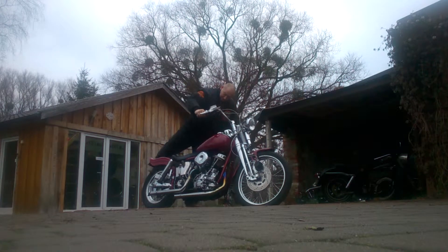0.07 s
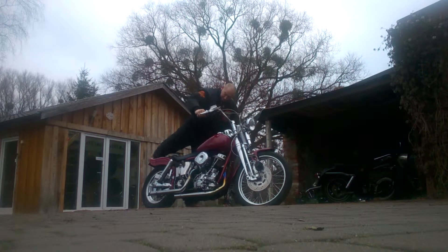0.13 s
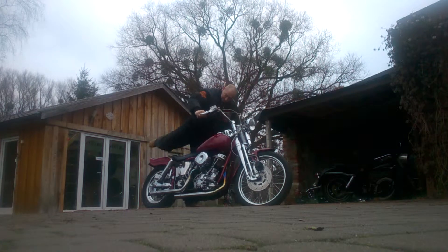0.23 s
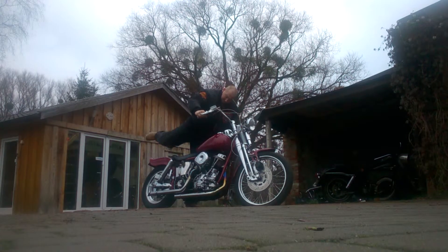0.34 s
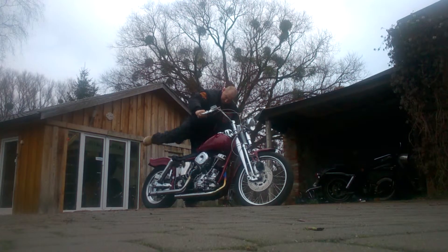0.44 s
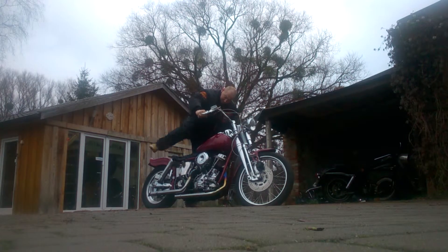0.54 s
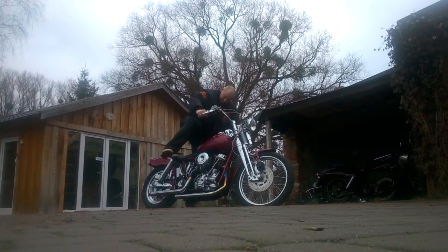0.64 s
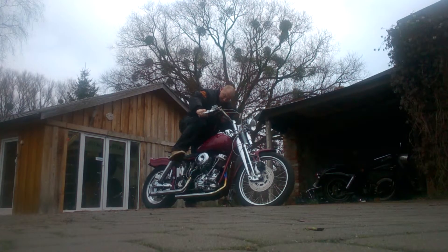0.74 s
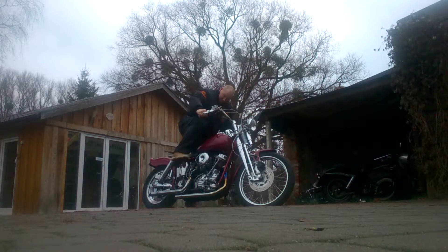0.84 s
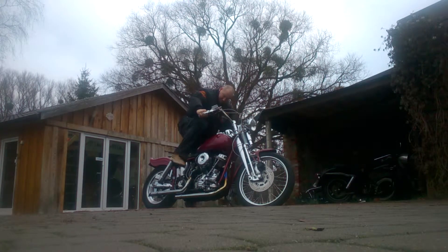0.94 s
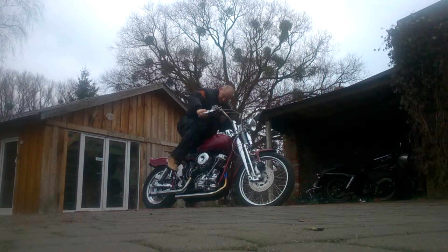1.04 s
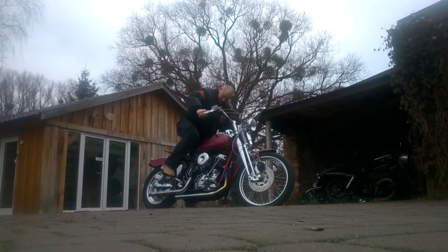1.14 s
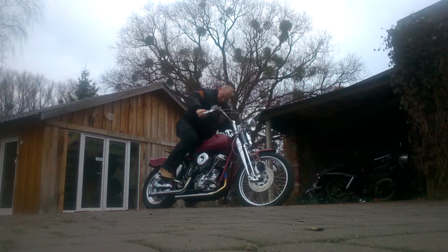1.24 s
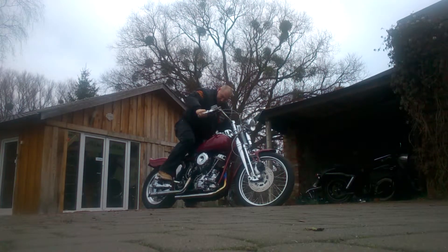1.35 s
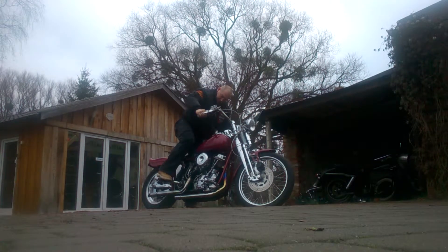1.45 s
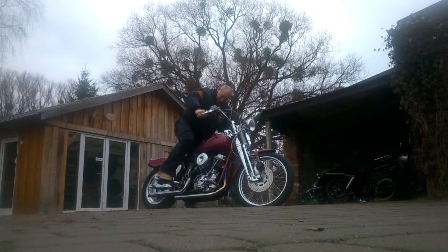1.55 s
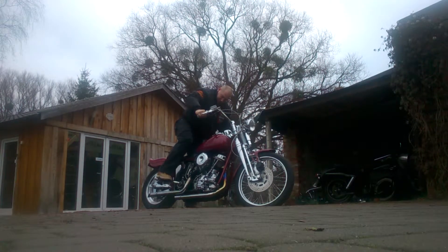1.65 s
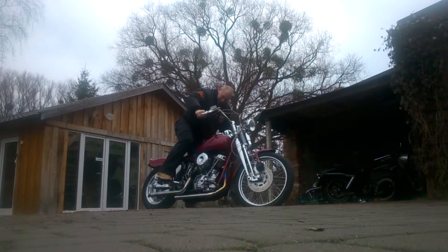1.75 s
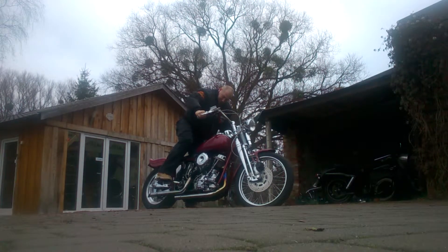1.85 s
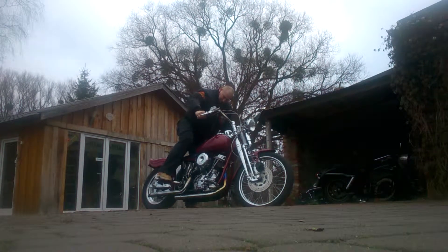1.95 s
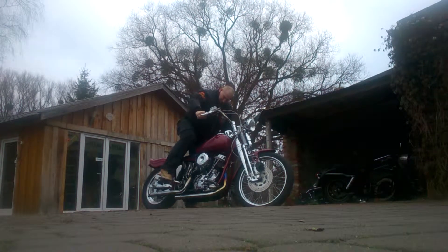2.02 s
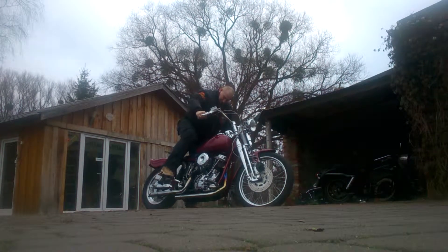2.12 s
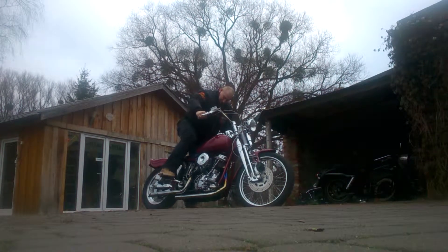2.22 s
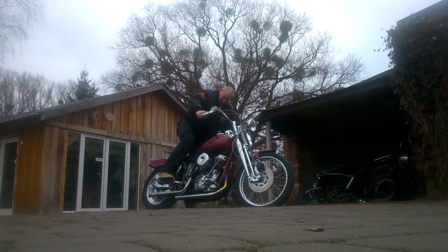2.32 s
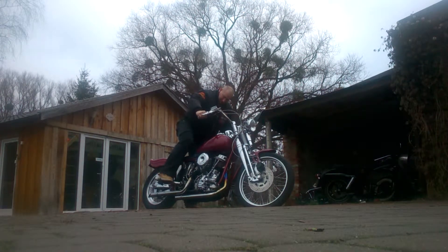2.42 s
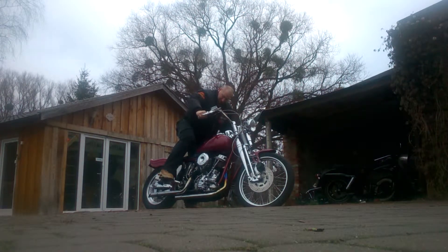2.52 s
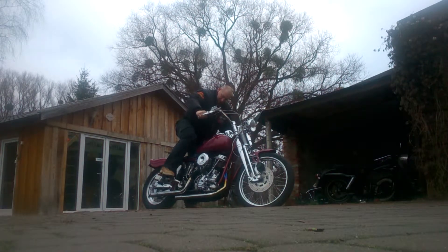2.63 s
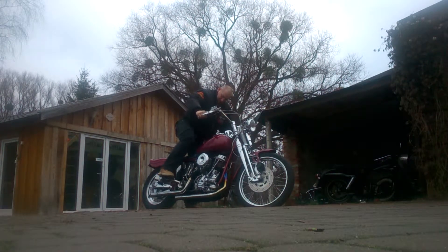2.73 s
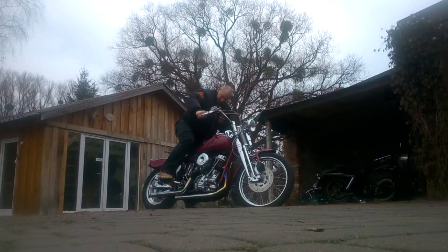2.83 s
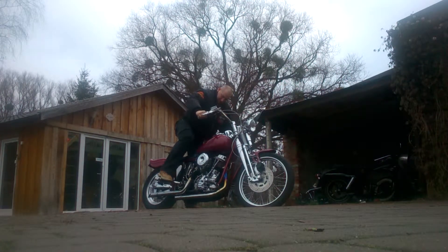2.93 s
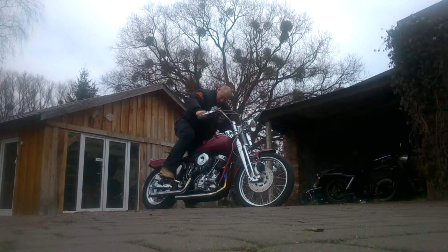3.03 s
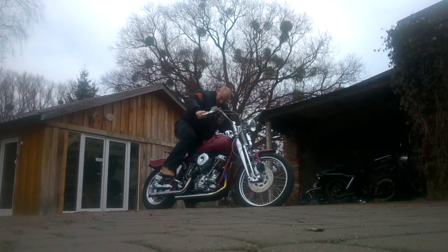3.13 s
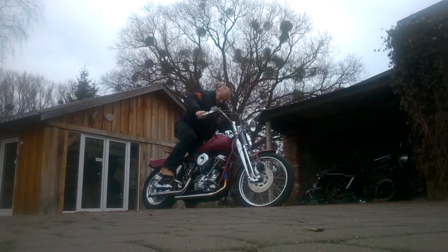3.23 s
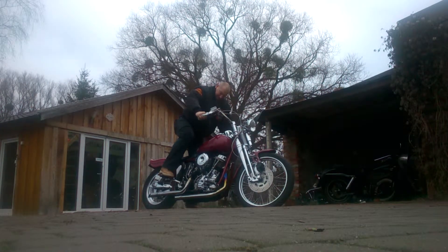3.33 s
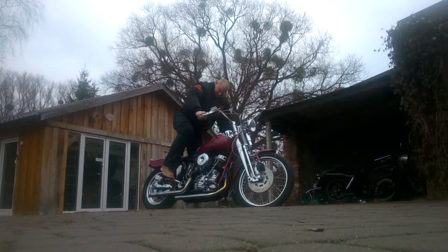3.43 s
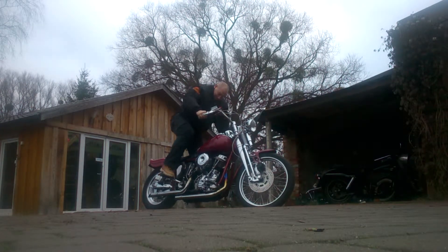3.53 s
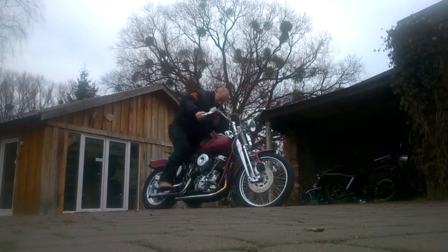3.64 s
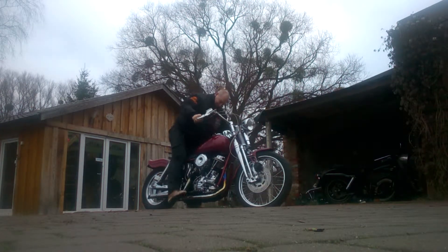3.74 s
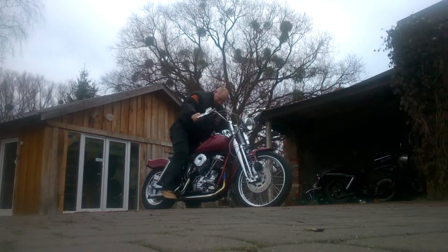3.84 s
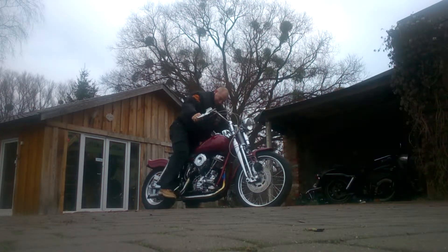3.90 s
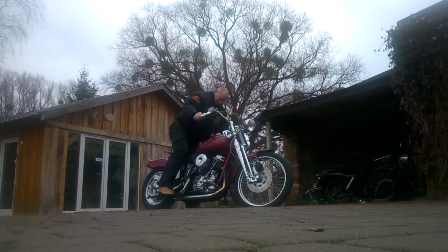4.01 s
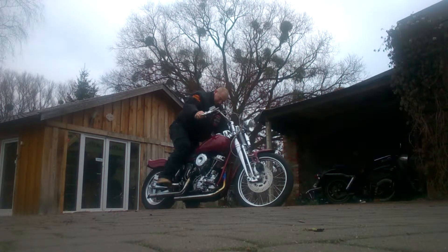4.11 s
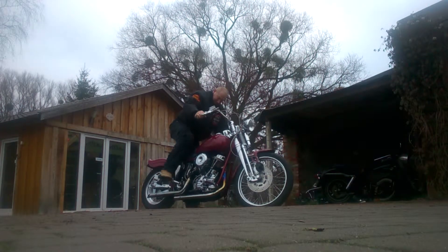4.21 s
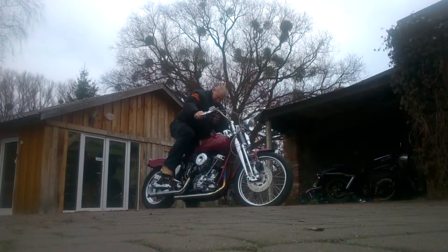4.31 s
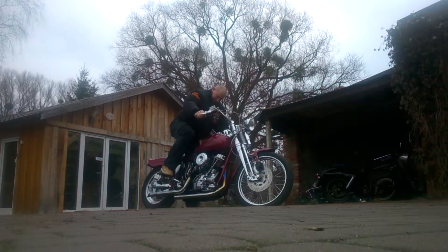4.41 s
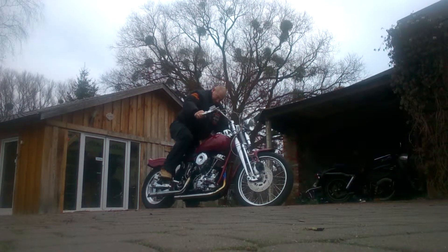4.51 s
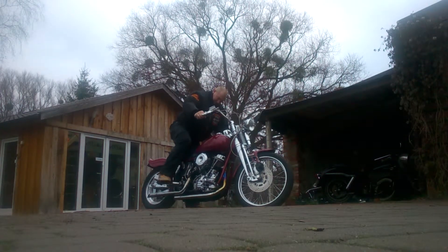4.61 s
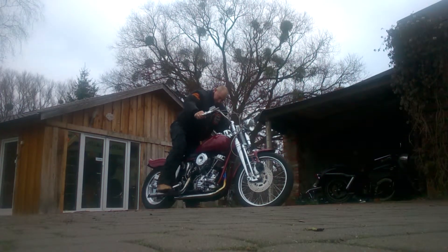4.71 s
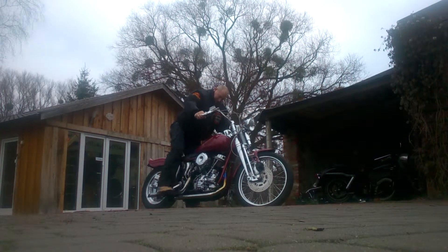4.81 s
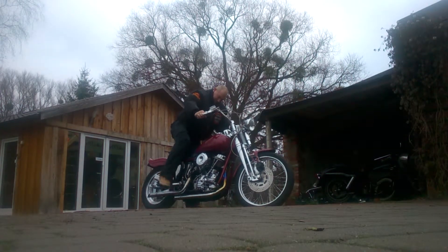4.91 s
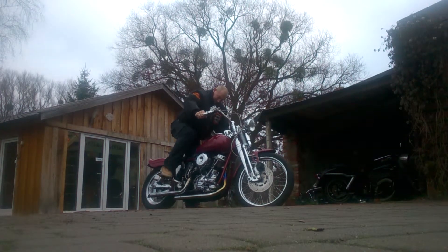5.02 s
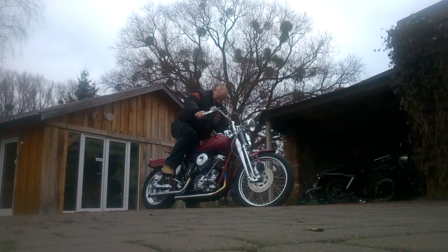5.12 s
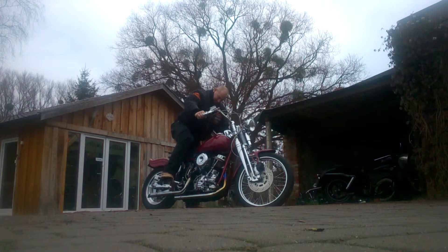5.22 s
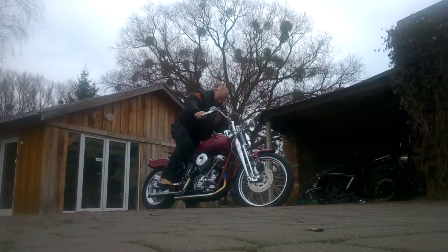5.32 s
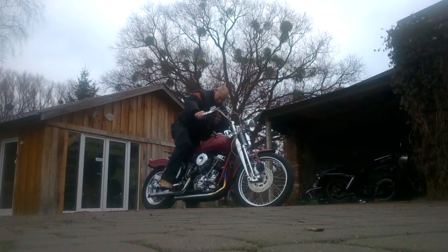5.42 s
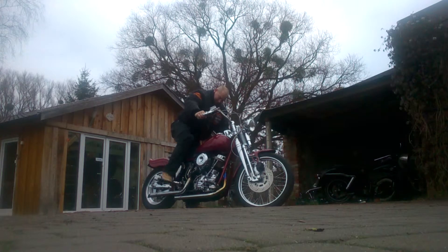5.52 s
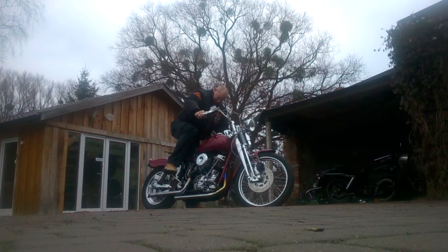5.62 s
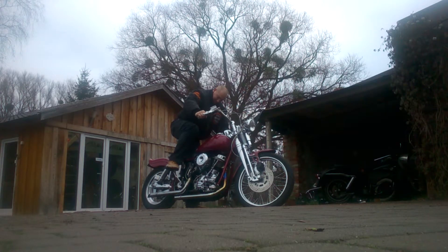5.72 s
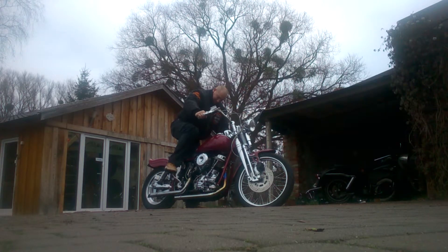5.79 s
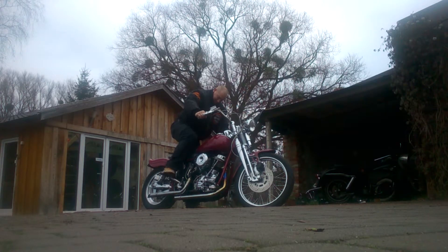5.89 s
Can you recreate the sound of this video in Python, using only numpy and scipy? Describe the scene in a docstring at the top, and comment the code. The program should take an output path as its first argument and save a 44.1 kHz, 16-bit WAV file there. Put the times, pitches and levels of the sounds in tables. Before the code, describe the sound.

A still paved yard between sheds, with low distant rumble, faint air hiss and barely audible bird chirps. Clothes and boots rustle softly from about 0.6 s. At 1.0 s a boot touches the pedal, and between 1.1 and 1.25 s it folds out in quick, ringing steel knocks. Faint taps at 2.1 and 2.3 s, then quiet. At 3.55 s a soft touch; at 3.65 s a knock and a growing groan. The kick lands at 3.8 s: loud mechanical clatter, rasping gears, small parts pinging, an airy intake gasp and a low, wavering exhaust boom, with a second cluster around 4.05-4.15 s. It never fires. The boom fades while the frame bumps dully around 4.45-4.6 s. A weak puff and breathy draw come at 5.0 s. The lever returns with ratchet snaps at 5.3 and 5.55-5.7 s, then duller knocks until 5.95 s. Short yard echo; bike left of centre.

```python
"""Failed kick-start in a yard

A big old twin-cylinder motorcycle is kicked over once in a paved yard and does not catch.
A boot folds out the pedal in knocks built from noise bursts and ringing modes; the kick rattles the gears.
Shaped hiss makes the intake gasp, a wavering low tone the exhaust boom, damped sines the rocking bike.
The lever comes back up over its ratchet in metallic snaps; early reflections and decaying noise echo it all.
"""
import sys
import numpy as np
from scipy import signal
from scipy.fft import rfft, irfft
from scipy.io import wavfile
from scipy.ndimage import uniform_filter1d

SR = 44100
rng = np.random.default_rng(int(sys.argv[2]) if len(sys.argv) > 2 else 0)


def int16_out(signal):
    """Quantize to a 16-bit WAV file."""
    q = np.round(np.clip(np.atleast_2d(signal).T, -1, 1) * 32767)
    wavfile.write(sys.argv[1], SR, q.astype(np.int16))


N = 262615
TIME = np.arange(N) / SR
RING_TIME = np.arange(SR // 2) / SR

# Event levels are relative: layer trims and the yard come after them.
# Light breeze rumble: [t/s, level/dB]
BREEZE_LEVEL = [(0, -75.5), (1.4, -67), (1.9, -83), (2.9, -84), (3.1, -64), (5.95, -64.5)]
# Faint chirps of far birds: [t/s, level/dB, middle f/Hz, length/s]
BIRD_CHIRPS = [(0.0, -88, 2130, .22), (1.579, -76, 2600, 0.019), (2.65, -68, 1670, 0.019)]
# Shifts of the rider's boots and clothes: [middle t/s, bell width (sigma)/s, level/dB]
RIDER_SHUFFLES = [(0.64, 0.11, -68.5), (1.33, 0.098, -63), (2.4, 0.092, -66.5), (2.7, 0.061, -67),
                  (3.4, 0.32, -75.5)]
# Light taps of the boot on the pedal: [t/s, level/dB]
BOOT_TAPS = [(1.0133, -53), (2.146, -54.5), (2.3292, -54.5), (3.542, -58)]
# Blows in the pedal, gears and valve train: [t/s, level/dB, treble relative to the blow/dB]
METAL_KNOCKS = [(1.0886, -46.5, -30), (1.1248, -51, -18), (1.1484, -48.5, -12), (1.179, -37, -9),
                (1.2198, -32.5, -7), (1.2376, -31, -11), (3.6628, -39.5, -5), (3.82, -27, -4),
                (4.0332, -28, -22), (4.0523, -27.5, -4), (4.0698, -26.5, -10), (4.092, -27, -5),
                (4.1399, -30, -14), (4.8241, -52.5, 3), (4.9906, -48, -10), (5.7635, -34, -21),
                (5.7705, -35, -34), (5.881, -41, -26), (5.9293, -40.5, -22), (5.9433, -37, -16)]
# Small loose parts pinging and chattering: [t/s, level/dB, f/Hz]
LOOSE_PINGS = [(1.09, -45, 2565), (1.238, -42, 1660), (3.829, -30, 1573), (4.071, -31, 2103),
               (4.142, -41, 3900), (4.619, -50.5, 3370), (4.883, -55, 3550), (5.566, -44, 4750),
               (5.773, -43.5, 4120)]
# Dull bumps of the frame as the bike is kicked and rocks: [t/s, level/dB, f/Hz]
FRAME_BUMPS = [(1.239, -49, 244), (3.814, -33.5, 193), (3.862, -33.5, 232), (3.887, -38, 184),
               (4.16, -42, 172), (4.442, -33, 79), (4.533, -28, 69), (4.569, -35, 100), (4.615, -34, 79),
               (4.823, -44, 235), (5.309, -49, 182), (5.797, -41.5, 61)]
# How hard the lever and flywheels drive the gears: [t/s, level/dB]
GEAR_DRIVE = [(3.65, -64.5), (3.73, -56.5), (3.83, -41.5), (3.92, -45.5), (4.08, -45), (4.16, -51),
              (4.52, -65), (4.83, -57.5), (4.95, -61), (5.04, -55), (5.23, -74.5), (5.36, -67),
              (5.53, -70.5), (5.7, -71.5), (5.95, -55)]
# The pistons draw air: [middle t/s, bell width (sigma)/s, level/dB]
INTAKE_GASPS = [(3.85, 0.016, -50.5), (3.975, 0.062, -41.5), (4.26, 0.032, -53), (5.03, 0.14, -66)]
# The pistons push gas into the pipe: [t/s, length before the fall/s, level/dB]
EXHAUST_PUFFS = [(3.824, 0.038, -35.5), (4.006, 0.13, -36.5), (4.383, 0.37, -48.5), (4.982, 0.017, -46.5)]
# The last air wheezes out of the cylinder: [middle t/s, bell width (sigma)/s, level/dB]
CYLINDER_WHEEZE = [(4.33, 0.055, -66.5)]
# A thin sizzle at the carburettor on the last draw: [middle t/s, bell width (sigma)/s, level/dB]
CARBURETTOR_SIZZLE = [(5.05, 0.076, -69)]
# The ratchet pawl drops over a tooth: [t/s, level/dB, ring relative to the blow/dB, rise to 99.9 %/s]
PAWL_DROPS = [(4.616, -41, -3, 0.019), (5.293, -37.5, -4.5, 0.042), (5.564, -35, 0, 0.011),
              (5.6258, -35, 2, 0.0064), (5.69, -32, -0.5, 0.0084)]

# Ringing modes of the engine cases: [f/Hz, level/dB, t60/s]
CASE_MODES = [(560, -8, 0.12), (652.5, -7, 0.22), (867.5, 1, 0.084), (1508, 1.5, 0.085), (1594, 3.5, 0.12),
              (1845, -2, 0.11), (2016, -4, 0.14), (2110, -0.5, 0.061), (2316, -4.5, 0.17),
              (2420, -3.5, 0.083), (2840, -5, 0.11), (3440, -9.5, 0.15), (3790, -6.5, 0.071),
              (4530, -25, 0.093), (4660, -19, 0.28)]
# Ringing modes of the ratchet pawl: [f/Hz, level/dB, t60/s]
RATCHET_MODES = [(1493, 2, 0.18), (1614, 2, 0.13), (1830, -6.5, 0.19), (2210, -11, 0.34),
                 (2510.6, -26, 0.11), (2840, -6, 0.14), (3580, -5.5, 0.11), (4200, -20, 0.05),
                 (5130, -1, 0.015), (6900, 10, 0.0091), (7800, -6, 0.024)]

# Spectrum of the open air: [f/Hz, relative level/dB]
AIR_SPECTRUM = [(20, -38), (40, -4.5), (60, -2.5), (100, -6), (150, -11), (400, -18), (800, -18),
                (1500, -26), (3300, -29.5), (5400, -34), (10000, -33.5), (13000, -40), (15500, -39.5)]
# Spectrum of steel clashing: [f/Hz, relative level/dB]
CLASH_SPECTRUM = [(150, -25), (400, 0), (800, 1), (1250, 1), (1950, -1.5), (3000, -2.5), (4700, -4),
                  (5900, -16), (8000, -6), (10500, -30.5), (15000, -28)]
# Spectrum of a sharp treble snap: [f/Hz, relative level/dB]
SNAP_SPECTRUM = [(1500, -7), (4800, -11), (5900, 1), (7200, 10), (8300, 6), (10000, -6), (14000, -23)]
# Spectrum of the frame's thud, groan and grumble: [f/Hz, relative level/dB]
THUD_SPECTRUM = [(60, -1), (130, 4), (220, -0.5), (320, -6), (700, -10), (1500, -21.5), (4000, -57)]
# Spectrum of the gear rasp: [f/Hz, relative level/dB]
GEAR_SPECTRUM = [(180, -11), (300, 4), (426, -4), (541, -1), (886, -2.5), (1020, 3.5), (1180, -5),
                 (1600, -2), (3070, -15.5), (4090, -14.5), (6190, -18), (9660, -16.5), (13500, -29)]
# Spectrum of air through the carburettor: [f/Hz, relative level/dB]
HISS_SPECTRUM = [(1500, 1), (4000, 3), (6000, -0.5), (7800, 7), (10500, -5), (13000, 1.5), (15500, -25)]

# Decay of the yard: [f/Hz, t60/s]
YARD_DECAY = [(100, 0.78), (400, 0.36), (1500, 0.32), (4000, 0.42), (8000, 0.24), (14000, 0.067)]
# How much louder the bike's direct sound is on the left: [f/Hz, left over right/dB]
LEFT_BIAS_CURVE = [(60, 7), (700, 2.5), (1250, 7.5), (2100, 20), (3400, 21), (5500, 12.5), (8500, 1.5),
                   (15000, 3.5)]
# Left-right likeness of diffuse sound: [f/Hz, likeness/0-1]
LIKENESS = [(60, 0.83), (300, 0.84), (700, 0.47), (1400, 0), (15000, 0.01)]

FULL_DRIVE_DB = -45.5  # the drive level at which grumble and hiss reach their full settings


def amp(db):
    """Turns decibels into gain."""
    return 10 ** (np.asarray(db) / 20)


def unit(x):
    """Scales to rms 1."""
    return x / np.sqrt(np.mean(x ** 2) + 1e-20)


def read(points, hz):
    """Reads a table along a log-frequency axis."""
    f, value = np.transpose(points)
    return np.interp(np.log(hz + 1), np.log(f + 1), value)


def level(rows):
    """Draws a dB curve as a gain, silent outside its span."""
    s, db = np.transpose(rows)
    return amp(np.interp(TIME, s, db, left=-np.inf, right=-np.inf))


def swells(rows):
    """Draws a bell-shaped rise and fall of gain for each row."""
    return sum(amp(db) * np.exp(-.5 * ((TIME - s) / width) ** 2) for s, width, db in rows)


def driven(full_db, slope):
    """Gain of a layer that follows the gear drive at slope dB per dB."""
    return amp(full_db) * (level(GEAR_DRIVE) / amp(FULL_DRIVE_DB)) ** slope


def colour(x, spectrum):
    """Gives a steady signal a spectrum, at rms 1."""
    gain = amp(read(spectrum, np.fft.rfftfreq(len(x), 1 / SR)))
    return unit(irfft(rfft(x) * gain, len(x)))


def noise(spectrum, size=N):
    """Coloured noise of rms 1."""
    return colour(rng.standard_normal(size), spectrum)


def burst(spectrum, t60):
    """Coloured noise that dies away like a struck thing."""
    return noise(spectrum, len(RING_TIME)) * dying(t60)


def dying(t60):
    """Exponential decay that falls 60 dB in t60 seconds."""
    return np.exp(-np.log(1000) * RING_TIME / t60)


def rising(seconds):
    """Soft onset that reaches 99.9 % in the given time."""
    return 1 - dying(seconds)


def add(mix, s, sound):
    """Mixes a sound in at time s."""
    part = mix[round(s * SR):][:len(sound)]
    part += sound[:len(part)]


def delayed(x, seconds):
    """The same sound, later."""
    return np.interp(TIME - seconds, TIME, x, left=0)


def high_pass(x, hz, order):
    """Rolls off what lies below hz."""
    return signal.sosfilt(signal.butter(order, hz, "high", fs=SR, output="sos"), x)


def ring(modes, rough=1.0):
    """Decaying modes; loose joints make each one flutter, differently at every blow."""
    steps = np.arange(0, RING_TIME[-1] + .01, .008)  # a new flutter value every 8 ms
    total = np.zeros(len(RING_TIME))
    for hz, db, t60 in modes:
        a, b = rng.standard_normal((2, len(steps)))
        flutter = np.interp(RING_TIME, steps, 1 + rough * (a + 1j * b)) / np.sqrt(1 + 2 * rough ** 2)
        carrier = np.exp(2j * np.pi * (hz * RING_TIME + rng.random()))
        total += amp(db) * dying(t60) * (flutter * carrier).real
    return total / np.linalg.norm(amp([db for _, db, _ in modes]))


def restless(x, patchy_db):
    """Contact points shift, so single resonances swell and fade from moment to moment."""
    z = signal.stft(x, nperseg=512, noverlap=384)[2]
    grain = rng.standard_normal(z.shape[::-1])
    smooth = uniform_filter1d(uniform_filter1d(grain, size=8, axis=0), size=4, axis=1)
    patches = unit(smooth).T
    gain = unit(amp(patchy_db * np.clip(patches, -2, 2)))
    return signal.istft(z * gain, nperseg=512, noverlap=384)[1][:N]


def diffuse(pair):
    """Makes two unrelated signals alike in the bass, as at two points close together."""
    a, b = rfft(pair)
    same = read(LIKENESS, np.fft.rfftfreq(pair.shape[1], 1 / SR))
    return irfft(np.array([a, same * a + np.sqrt(1 - same ** 2) * b]), pair.shape[1])


def outdoors():
    """Distant rumble and hiss of a still day as broadband noise, and a light breeze as low noise."""
    air = amp(-68.5) * np.array([noise(AIR_SPECTRUM), noise(AIR_SPECTRUM)])
    gust = [(20, -34), (45, 3.5), (62, 0.5), (100, -5.5), (200, -27), (800, -40.5)]
    breeze = amp(1) * level(BREEZE_LEVEL) * np.array([noise(gust), noise(gust)])
    return amp([[2], [-1.5]]) * diffuse(air + breeze)


def birds(fall=.04, waver=0.0065):
    """Short, wavering, slightly falling whistles: one gliding tone each."""
    out = np.zeros(N)
    for s, db, hz, length in BIRD_CHIRPS:
        u = np.linspace(0, 1, int(length * SR))
        wobble = noise([(100, 2), (1000, -58)], len(RING_TIME))[:len(u)]
        pitch = hz * (1 + fall * (.5 - u) + waver * wobble)
        whistle = np.sin(2 * np.pi * np.cumsum(pitch) / SR)
        add(out, s, amp(db) * np.sin(np.pi * u) * whistle)
    return out


def rider(crease_db=2, ticks_per_s=20, tick_db=-21):
    """Clothes and boots rub in a faint uneven rustle, with stray ticks as they snag."""
    creases = noise([(1, -8), (40, 15), (150, -53), (1000, -90)])
    cloth = noise([(300, 8), (900, 2), (2800, -10.5), (5000, -14.5), (12000, -14.0)])
    rustle = amp(-7 + crease_db * creases) * cloth
    snags = (rng.random(N) < ticks_per_s / SR) * rng.uniform(.3, 1, N)
    tick_gain = unit(signal.oaconvolve(snags, dying(0.016))[:N])
    ticks = tick_gain * noise([(800, -11), (2800, 4), (5000, -9), (10000, -25)])
    return swells(RIDER_SHUFFLES) * (rustle + amp(tick_db) * ticks)


def taps(t60=0.069, rise_s=0.02):
    """A sole touches the pedal too softly to ring the engine: a soft-edged noise burst."""
    out = np.zeros(N)
    for s, db in BOOT_TAPS:
        add(out, s, amp(db - 6.5) * burst(CLASH_SPECTRUM, t60) * rising(rise_s))
    return out


def knocks(clash_db=-3, tick_db=-1, metal_db=-6.5, thud_db=-15):
    """Steel meets steel: a short clash, the cases ring, and the frame answers with a slower thud."""
    out = np.zeros(N)
    for s, db, treble_db in METAL_KNOCKS:
        clash = amp(clash_db) * burst(CLASH_SPECTRUM, 0.035)
        tick = amp(tick_db + treble_db) * burst(SNAP_SPECTRUM, 0.021)
        metal = amp(metal_db) * ring(CASE_MODES, rough=1.14)
        thud = amp(thud_db) * burst(THUD_SPECTRUM, 0.16) * rising(0.016)
        add(out, s, amp(db) * ((clash + tick + metal) * rising(0.01) + thud))
    return out


def pings(t60=0.047):
    """Each small part rings with a tight cluster of modes."""
    out = np.zeros(N)
    for s, db, hz in LOOSE_PINGS:
        cluster = [(hz * .93, -4, t60), (hz, 0, t60), (hz * 1.06, -2, t60)]
        add(out, s, amp(db) * ring(cluster, rough=.8) * rising(0.0017))
    return out


def bumps(gain_db=5, t60=0.094, rise_s=0.012):
    """The frame bumps softly: heavily damped sines of a few cycles."""
    out = np.zeros(N)
    for s, db, hz in FRAME_BUMPS:
        wave = np.sin(2 * np.pi * hz * RING_TIME)
        add(out, s, amp(db + gain_db) * wave * dying(t60) * rising(rise_s))
    return out


def gears(teeth_per_s=300, spread_db=4, judder_db=2):
    """Tooth and chain contacts rattle the cases over a juddering rasp and a low grumble."""
    hits = (rng.random(N) < teeth_per_s / SR) * rng.choice([-1, 1], N)
    contacts = hits * amp(spread_db * np.minimum(rng.exponential(1, N), 3))
    unevenness = noise([(1, -13), (20, 11), (70, -12), (200, -36), (1000, -90)])
    judder = unit(amp(judder_db * unevenness))
    rasp = colour(unit(contacts) + 1.08 * rng.standard_normal(N), GEAR_SPECTRUM)
    cases = unit(signal.oaconvolve(contacts, ring(CASE_MODES))[:N])
    rattle = level(GEAR_DRIVE) * (amp(-3) * rasp + amp(-14) * cases)
    grumble = driven(-47, slope=0.68) * noise(THUD_SPECTRUM)
    return judder * (rattle + grumble)


def intake():
    """Air hisses through the carburettor as the pistons draw."""
    draw = swells(INTAKE_GASPS) + driven(-49, slope=0.86)
    return amp(-9.0) * draw * noise(HISS_SPECTRUM)


def groan(start_s=3.665, end_s=3.85, start_db=-59.5, growth_db_per_s=95, release_s=0.012):
    """The frame groans louder under the rider's weight on the lever, until the engine gives way."""
    growth = amp(start_db + growth_db_per_s * (np.minimum(TIME, end_s) - start_s))
    release = np.exp(-np.maximum(TIME - end_s, 0) / release_s)
    return (TIME > start_s) * growth * release * noise(THUD_SPECTRUM)


def exhaust(pipe_hz=64.2, waver=0.051, rise_s=0.0099, fall_db_per_s=102):
    """Unburnt charge pushed into the pipe sets its air column booming: a wavering tone plus low noise."""
    drift = noise([(1, -3.0), (12, -1.0), (40, -60), (200, -150)])
    phase = 2 * np.pi * np.cumsum(pipe_hz * (1 + waver * drift)) / SR
    flow = noise([(20, -6), (45, -3), (70, -6), (110, -16.5), (250, -18), (1000, -68)])
    push = np.zeros(N)
    for s, length, db in EXHAUST_PUFFS:
        rise = np.clip((TIME - s) / rise_s, 0, 1)
        push += rise * amp(db - fall_db_per_s * np.maximum(TIME - s - length, 0))
    return push * (np.sqrt(2) * np.sin(phase) + amp(-10.5) * flow)


def leaks(flutter_db=3):
    """Air squeezed through narrow gaps sings in a band of its own and flutters."""
    unevenness = noise([(1, -22), (60, 0), (200, -42), (1000, -96)])
    flutter = unit(amp(flutter_db * unevenness))
    thin = noise([(5000, -39.5), (8800, -13), (9800, -2), (11000, 1), (12200, -14), (16000, -30.5)])
    reedy = noise([(1000, -44), (2000, -17), (2450, -4), (3000, -14), (6000, -51)])
    return flutter * (swells(CARBURETTOR_SIZZLE) * thin + swells(CYLINDER_WHEEZE) * reedy)


def ratchet(clash_db=-2, tick_db=-8):
    """The sprung pawl snaps onto each tooth as the lever comes back up: noise bursts and ringing modes."""
    out = np.zeros(N)
    for s, db, ring_db, rise_s in PAWL_DROPS:
        clash = amp(clash_db) * burst(CLASH_SPECTRUM, 0.046)
        tick = amp(tick_db) * burst(SNAP_SPECTRUM, 0.032)
        metal = amp(ring_db) * ring(RATCHET_MODES, rough=1.7)
        add(out, s, amp(db) * (clash + tick + metal) * rising(rise_s))
    return out


def paths(x, count, turns_per_s=3.7):
    """Splits a sound smoothly among several paths in turn, as rider and lever move."""
    shares = [np.maximum(np.cos(2 * np.pi * (turns_per_s * TIME + k / count)), 0) for k in range(count)]
    return x * shares / np.linalg.norm(shares, axis=0)


def scatter(x, count=14):
    """Paving, tank and frame send early reflections, different ones to each side."""
    echoes = np.zeros((2, 1024))
    for side in echoes:
        side[rng.integers(20, 330, count)] = rng.choice([-1, 1], count) / np.sqrt(count)
    return signal.oaconvolve(x[None], echoes, axes=1)[:, :N]


def reverberate(x):
    """Diffuse echoes between the sheds: noise with each band dying at its own speed."""
    f, t, z = signal.stft(diffuse(rng.standard_normal((2, SR))), SR, nperseg=256)
    decay = amp(-60 * t / read(YARD_DECAY, f)[:, None]) * (t > .006)
    tail = signal.istft(z * decay, SR, nperseg=256)[1]
    return signal.fftconvolve(x[None], tail / np.linalg.norm(tail[0]), axes=1)[:, :N]


def yard(x, lag_s=0.000194):
    """The bike stands left of centre; a shed wall answers on the right, then the yard rings briefly."""
    bias = amp(read(LEFT_BIAS_CURVE, np.fft.rfftfreq(N, 1 / SR)) / 2)  # half the bias on each side
    left = irfft(rfft(x) * bias, N)
    right = delayed(irfft(rfft(x) / bias, N), lag_s)
    direct = np.array([left, right])
    early = sum(scatter(part) for part in paths(high_pass(x, 1570, order=1), count=4))
    wall = delayed(high_pass(x, 2100, order=1), 0.021)
    wet = sum(reverberate(part) for part in paths(high_pass(x, 109, order=2), count=3))
    # column gains in dB: left, right
    return direct + amp([[-4.5], [-5]]) * early + amp([[-24], [-10]]) * wall + amp([[-7], [-10]]) * wet


def scene():
    """Bike, rider and birds sound into the yard, over the open air."""
    rubbing = restless(gears() + groan() + intake() + leaks() + rider(), patchy_db=3.8)
    blows = restless(knocks() + taps() + ratchet(), patchy_db=3.3)
    return yard(rubbing + blows + pings() + exhaust() + bumps() + birds()) + outdoors()


def record(dry, whine_hz=15000, edge_hz=15700):
    """Cuts the deepest bass, adds a thin whine of wavering level and limits the treble."""
    waver_db = noise([(1, 7), (20, -10), (200, -58)])
    whine_db = np.interp(TIME, [3.5, 4.4, 5.1, 5.9], [-79.0, -67, -70.5, -74]) + waver_db
    whine = amp(whine_db + np.array([[0], [-8]])) * np.sin(2 * np.pi * whine_hz * TIME)
    low_cut = amp(read([(15, -34), (28, -21), (45, -0.5)], np.fft.rfftfreq(N, 1 / SR)))
    heard = irfft(rfft(dry) * low_cut, N) + whine
    treble_limit = signal.firwin(511, edge_hz, window=("kaiser", 9), fs=SR)
    return signal.oaconvolve(heard, treble_limit[None], "same")


dry = scene()
out = record(dry)
int16_out(out)
```